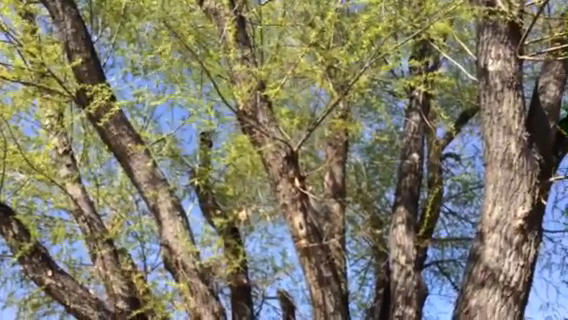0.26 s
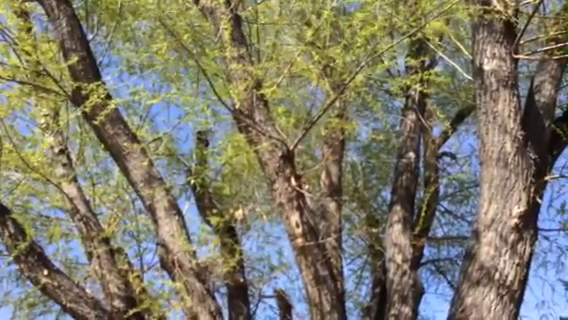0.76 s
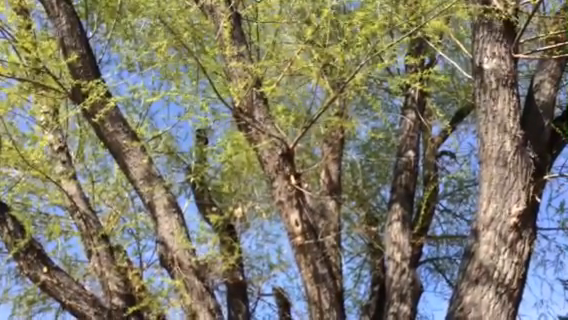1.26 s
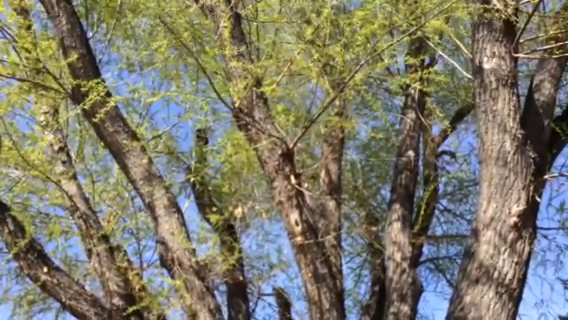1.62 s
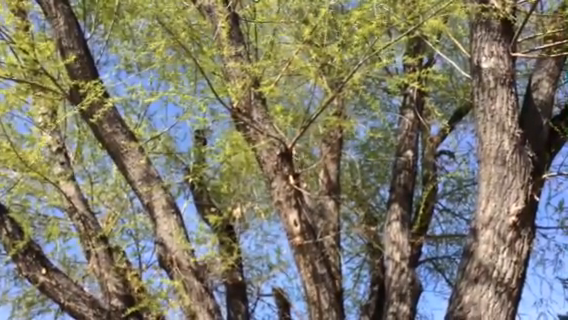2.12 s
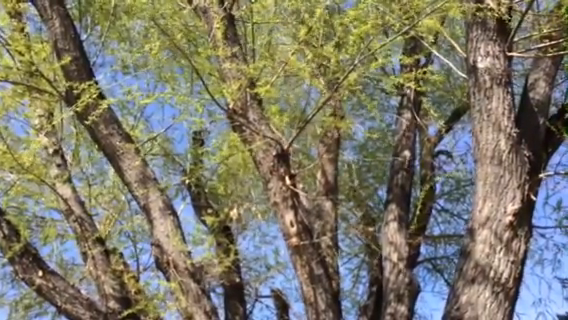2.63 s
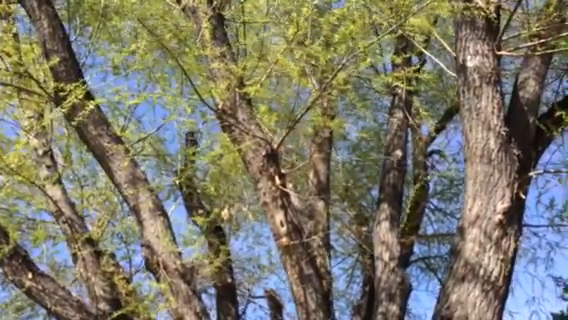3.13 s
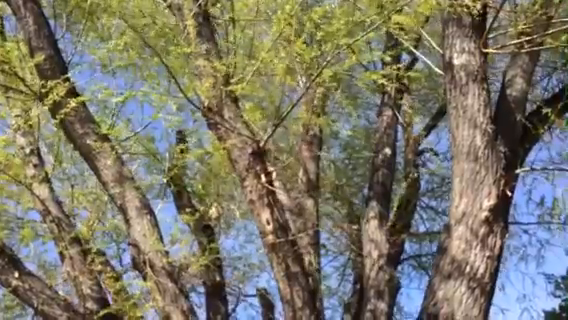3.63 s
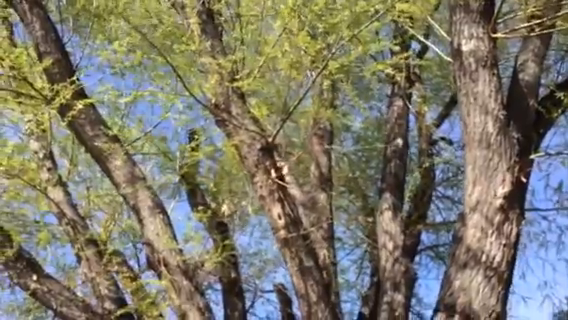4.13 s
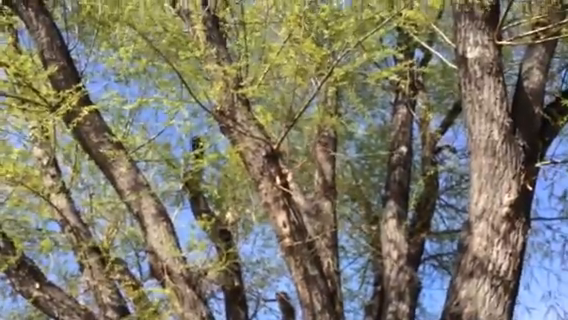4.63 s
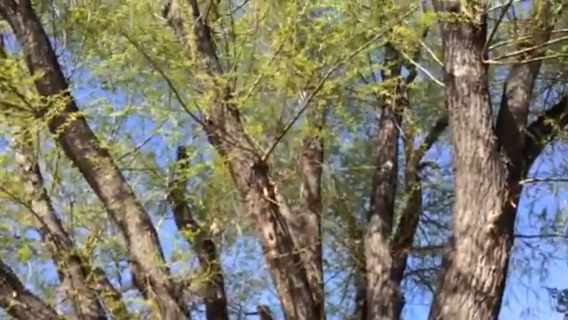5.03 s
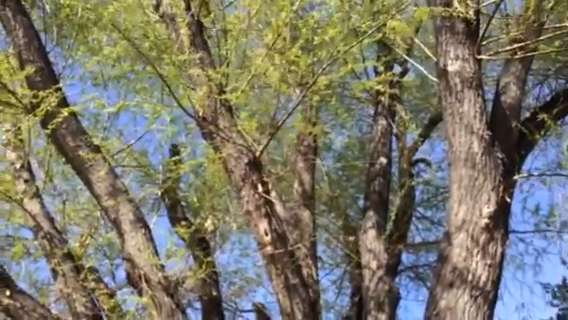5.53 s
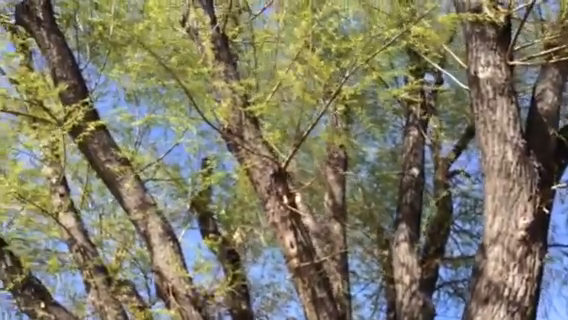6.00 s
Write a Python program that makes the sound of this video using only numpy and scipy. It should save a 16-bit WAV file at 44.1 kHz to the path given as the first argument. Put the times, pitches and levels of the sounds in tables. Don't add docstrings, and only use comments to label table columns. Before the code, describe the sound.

A quiet grove with low, uneven road rumble and barely audible leaves. Two quick bright sparrow chirps come early, amid dry ticks and faint high birdsong. Midway, one woodpecker roll of about seventeen rapid knocks bursts out, dry, woody and hollow, with short woodland echoes. Quick warbler whistles overlap its later part and continue briefly, then distant rough crow caws close the scene. Single-channel microphone, open air, no close handling.

```python
import sys
import numpy as np
from scipy import signal
from scipy.fft import rfft, irfft
from scipy.io import wavfile

SR = 44100
rng = np.random.default_rng(int(sys.argv[2]) if len(sys.argv) > 2 else 0)


def persist_wave(psi):
    counts = np.round(np.clip(psi, -1, 1) * 32767).astype(np.int16)
    wavfile.write(sys.argv[1], SR, np.atleast_2d(counts).T)


def voltage_ratio(level):
    return 10 ** (np.asarray(level, float) / 20)


N = 276066

# start in seconds, strength in dB.
ROLL = [(3.336, -29.5), (3.398, -25), (3.4579, -24.5), (3.5216, -24), (3.5866, -23.5), (3.6536, -23),
        (3.721, -23.5), (3.7911, -24), (3.8606, -22.5), (3.9324, -23), (4.0035, -23), (4.0758, -22),
        (4.1492, -22), (4.223, -23), (4.2973, -23), (4.3723, -22.5), (4.4508, -23.5)]
EVEN_SHARE, SCOOP_SHARE = 0.41, 0.78


def rms_one(x):
    return x / np.sqrt(np.mean(x ** 2) + 1e-20)


def add(track, sound, s):
    i = max(round(s * SR), 0)
    track[i:i + len(sound)] += sound[:N - i]


def convolve(x, response):
    return signal.fftconvolve(x, response)[:N]


def drift(rate_hz, size):
    r = np.exp(-2 * np.pi * rate_hz / SR)
    settle = 8000
    slow = signal.lfilter([1], [1, -2 * r, r * r], rng.standard_normal(size + settle))[settle:]
    return rms_one(slow - slow.mean())


def coloured(spectrum, size):
    hz, db = np.transpose(spectrum)
    bins_hz = np.arange(size // 2 + 1) * SR / size
    shape_db = np.interp(np.log(bins_hz + 1), np.log(hz), db)
    return rms_one(irfft(rfft(rng.standard_normal(size)) * voltage_ratio(shape_db), size))


def band(x, low_hz, high_hz):
    return signal.sosfilt(signal.butter(2, [low_hz, high_hz], "band", fs=SR, output="sos"), x)


def resonance(x, hz, width_hz):
    r = np.exp(-np.pi * width_hz / SR)
    poles = [1, -2 * r * np.cos(2 * np.pi * hz / SR), r * r]
    return signal.lfilter([(1 - r * r) / 2, 0, (r * r - 1) / 2], poles, x)


def dying(noise, t60_s):
    tail = noise * voltage_ratio(-60 * np.arange(len(noise)) / SR / t60_s)
    return tail / np.sqrt(np.sum(tail ** 2))


def glide(length_s, first_hz, middle_hz, last_hz, edge_s=0.0027):
    u = np.linspace(0, 1, round(length_s * SR))
    pitch = np.polyval(np.polyfit([0, 0.5, 1], [first_hz, middle_hz, last_hz], 2), u)
    edge = np.clip(np.minimum(u, 1 - u) * length_s / edge_s, 0, 1)
    return pitch, np.sin(edge * np.pi / 2)


def wavering_phase(pitch, waver, rate_hz):
    trembling = pitch * (1 + waver * drift(rate_hz, len(pitch)))
    return 2 * np.pi * np.cumsum(trembling) / SR


def traffic_and_leaves():
    # time in seconds, level in dB.
    swell = [(0.0, -58.5), (.5, -60), (.82, -55), (1.06, -59.5), (1.71, -57.5), (2.79, -58.5), (3.05, -61),
             (3.82, -53.5), (4.27, -58), (5.18, -56.5), (5.98, -60), (6.26, -57)]
    # frequency in Hz, density in dB per Hz.
    air_colour = [(18, -51), (30, 1.5), (64, 5), (132, 2), (155, 0.5), (248, -14), (601, -21.5),
                  (1180, -24.5), (2270, -31.5), (3630, -32), (5090, -37.5), (12700, -45.5), (15200, -46)]
    t = np.arange(N) / SR
    traffic_db = np.interp(t, *np.transpose(swell))
    leaves_db = -67.5 + 0.1847 * t + 0.063 * (traffic_db - traffic_db.mean())
    air = coloured(air_colour, N)
    low = signal.sosfilt(signal.butter(4, 250, fs=SR, output="sos"), air)
    high = signal.sosfilt(signal.butter(4, 250, "high", fs=SR, output="sos"), air)
    rumble = rms_one(low) * voltage_ratio(traffic_db + 0.34 * drift(3.8, N))
    leaves = rms_one(high) * voltage_ratio(leaves_db + 1.2 * drift(1.54, N))
    return rumble + leaves


def idling_motors():
    # pitch in Hz, width in Hz, level in dB.
    hums = [(73.94, 35, -65.5), (137.9, 15.7, -65.5)]
    out = np.zeros(N)
    for hz, width_hz, db in hums:
        once = resonance(rng.standard_normal(N), hz, width_hz)
        out += voltage_ratio(db) * rms_one(resonance(once, hz, width_hz))
    return out


def twigs():
    # start in seconds, peak in dB, lowest and highest frequency in Hz.
    ticks = [(.1344, -63.5, 4500, 12000), (.519, -44.5, 1200, 3220), (.6, -63, 6000, 7200),
             (0.61, -48, 2300, 10950), (.633, -45, 1900, 7850), (.84, -59, 5500, 9000),
             (0.913, -51, 4500, 8360), (1.245, -59.5, 6500, 10900), (1.284, -60, 6560, 11000),
             (1.379, -51, 1590, 2600), (1.389, -58, 5530, 8950), (1.665, -58, 3500, 9000),
             (2.125, -59, 4500, 8000), (2.326, -58, 5900, 10600), (2.514, -59, 6000, 8950),
             (2.527, -53.5, 4300, 7860), (3.087, -55.5, 5500, 8750), (3.408, -52.5, 7140, 14000),
             (3.449, -56, 4500, 14000), (5.68, -59.5, 5500, 8950)]
    out = np.zeros(N)
    for s, db, low_hz, high_hz in ticks:
        crack = dying(band(rng.standard_normal(900), low_hz, high_hz), 0.0189)
        add(out, voltage_ratio(db + 8.5) * crack, s)
    return out


def crows(calls, throat_hz, sag, breath_db, hiss_db, wet_db):
    out = np.zeros(N)
    rough, spread = 0.035, 0.2
    for s, length_s, top_hz, db in calls:
        pitch, envelope = glide(length_s, 0.97 * top_hz, top_hz, sag * top_hz, edge_s=0.025)
        centre = throat_hz or 2 * top_hz
        phase = wavering_phase(pitch, rough, 130)
        voice = np.zeros(len(pitch))
        for k in range(1, 6):
            weight = np.exp(-0.5 * (np.log(k * top_hz / centre) / spread) ** 2)
            voice += weight * np.sin(k * phase)
        puffs = rng.standard_normal(len(pitch)) * (1 + np.cos(phase))
        breath = voltage_ratio(breath_db) * rms_one(band(puffs, 0.61 * centre, 1.07 * centre))
        hiss = voltage_ratio(hiss_db) * rms_one(band(puffs, 2300, 4400))
        level = voltage_ratio(db + 2.65 * drift(55, len(pitch)))
        add(out, level * envelope * (rms_one(voice) + breath + hiss), s)
    return out + voltage_ratio(wet_db) * convolve(out, dying(rng.standard_normal(SR), 0.987))


def farthest_crows():
    # start in seconds, length in seconds, top pitch in Hz, level in dB.
    far_caws = [(0.01, 0.1135, 650.4, -71.5), (.71, .096, 620.8, -69.5), (.8, 0.13, 658, -66.5),
                (2.93, .11, 754, -70.5), (3.08, 0.12, 741.7, -82.5), (4.72, .21, 775.6, -65.5),
                (4.95, 0.1056, 786, -77.5), (5.2, 0.128, 430, -78)]
    return crows(far_caws, throat_hz=0, sag=0.965, breath_db=-5, hiss_db=-30, wet_db=0.5)


def distant_crows():
    # start in seconds, length in seconds, top pitch in Hz, level in dB.
    caws = [
        (5.35, 0.0693, 551, -66),
        (5.385, .11, 570.1, -61.5),
        (5.5, 0.084, 690, -65),
        (5.67, 0.16, 752, -72.5),
        (5.805, .105, 567.5, -60),
        (5.92, 0.093, 680, -65),
        (6.06, 0.18, 718, -74),
    ]
    return crows(caws, throat_hz=1580, sag=0.91, breath_db=-6, hiss_db=-11, wet_db=-2)


def bent(s, length_s, first_hz, last_hz, db, share):
    return s, length_s, first_hz, first_hz + share * (last_hz - first_hz), last_hz, db


def whistles(notes, flutter_db, waver):
    out = np.zeros(N)
    for s, length_s, first_hz, middle_hz, last_hz, db in notes:
        pitch, envelope = glide(length_s, first_hz, middle_hz, last_hz)
        phase = wavering_phase(pitch, waver, 150)
        level = voltage_ratio(db + 4 + flutter_db * drift(60, len(pitch)))
        tone = np.sin(phase) + voltage_ratio(-31) * np.sin(2 * phase)
        add(out, envelope * level * tone, s)
    return out


def warbler_notes():
    # start in seconds, length in seconds, first pitch in Hz, level in dB.
    falls = [(0, 0.0127, 2600, -83.5), (0.081, 0.0224, 2700, -77), (1.606, 0.066, 4990, -81),
             (1.659, 0.033, 3812, -74), (1.789, .014, 5260, -75), (1.832, .058, 4270, -77),
             (2.008, 0.0107, 4245, -74), (2.02, .13, 4230, -77), (2.142, 0.03, 3400, -76),
             (2.288, .02, 4270, -75.5), (2.315, .036, 4674, -76.5), (2.545, .05, 4250, -77.5),
             (2.805, 0.059, 3500, -79), (3.102, 0.073, 4100, -82.5), (3.195, .02, 3040, -80.5)]
    rises = [(0, .069, 3700, -79), (0.174, 0.027, 2190, -79), (1.61, .025, 2743, -82),
             (1.822, 0.042, 2350, -83.5), (2.059, .03, 2750, -78), (2.285, .015, 2300, -75),
             (2.49, 0.06, 3633, -80), (2.735, .087, 2830, -78)]
    # start in seconds, length in seconds, top pitch in Hz, level in dB.
    held = [(0.343, 0.063, 3200, -80), (0.497, .045, 4600, -75), (0.637, 0.0287, 4050, -75),
            (.875, .1, 2470, -78), (1.855, 0.061, 2950, -77), (1.859, 0.055, 3300, -71.5),
            (2.06, .061, 3224, -77.5), (2.345, 0.043, 3142, -74.5), (2.373, .02, 3950, -78),
            (2.569, 0.0675, 3230, -76), (3.15, 0.028, 3950, -77), (3.7, 0.014, 4430, -82),
            (4.458, 0.032, 3241, -60.5), (4.519, .04, 3258, -74), (4.744, .083, 4700, -80),
            (4.91, 0.023, 4140, -65)]
    # start in seconds, length in seconds, first and last pitch in Hz, level in dB.
    slides = [(3.809, 0.0594, 3300, 4300, -66.5), (4.114, 0.0336, 4170, 4626, -67),
              (4.159, 0.023, 4400, 3660, -60.5), (4.256, 0.039, 3960, 2420, -65.5),
              (4.303, 0.025, 3200, 3804, -65), (4.391, .035, 4350, 3690, -73),
              (4.596, .015, 4220, 3760, -73.5), (4.708, 0.0474, 4030, 4707, -63.5),
              (4.877, 0.036, 4470, 3700, -66.5), (5.02, .012, 2400, 3670, -68),
              (5.035, 0.0176, 3700, 2636, -64), (5.055, .022, 3370, 2820, -74.5)]
    scoops = [(3.657, 0.046, 4900, 3790, -65.5), (4.039, 0.021, 3500, 3828, -66.5),
              (4.547, 0.043, 4380, 4620, -79), (4.564, 0.037, 4180, 2570, -64.5),
              (4.609, .025, 2900, 3620, -65.5), (4.758, 0.023, 4720, 3663, -63.5),
              (4.848, 0.033, 3000, 3348, -72), (4.96, 0.068, 4160, 3330, -77.5),
              (4.984, 0.027, 3500, 2453, -65.5), (5.229, 0.074, 2730, 3320, -74.5),
              (5.3, 0.059, 3530, 2820, -74)]
    notes = [bent(s, d, hz, 0.77 * hz, db, EVEN_SHARE) for s, d, hz, db in falls]
    notes += [bent(s, d, hz, 1.2 * hz, db, SCOOP_SHARE) for s, d, hz, db in rises]
    notes += [(s, d, 0.96 * hz, hz, 0.96 * hz, db) for s, d, hz, db in held]
    notes += [bent(*row, EVEN_SHARE) for row in slides]
    notes += [bent(*row, SCOOP_SHARE) for row in scoops]
    return notes


def songbirds():
    # start in seconds, length in seconds, first and last pitch in Hz, level in dB.
    seep_rows = [(0.438, 0.065, 6240, 4600, -76), (0.472, 0.049, 5600, 4817, -77),
                 (1.245, .04, 6880, 8520, -78), (1.88, 0.03, 6330, 5950, -80),
                 (2.08, 0.047, 6300, 6430, -87), (2.573, 0.0563, 6257, 6300, -71.5)]
    seeps = [bent(*row, EVEN_SHARE) for row in seep_rows]
    dry = whistles(warbler_notes(), flutter_db=1.8, waver=0.006)
    dry += whistles(seeps, flutter_db=3, waver=0.012)
    return dry + voltage_ratio(-6.5) * convolve(dry, dying(rng.standard_normal(SR), 0.28))


def sparrow():
    # seconds from chirp start, length in seconds, first and last pitch in Hz, level in dB.
    chirp = [
        (-.037, .037, 4700, 5900, -67),
        (-.02, .025, 6100, 5500, -72),
        (0.0, .011, 3650, 4400, -60),
        (.004, .027, 4200, 5200, -53.5),
        (.027, .011, 5300, 3600, -55),
        (.034, .014, 3750, 3650, -52),
        (.057, .014, 3800, 3450, -54),
    ]
    # chirp start in seconds, lift in dB.
    chirp_starts = [
        (0.701, -0.5),
        (1.2751, 0),
    ]
    # delay in seconds, level in dB.
    echoes = [(.026, -16), (.058, -11), (.088, -21)]
    notes = []
    for start, lift_db in chirp_starts:
        for s, length_s, first_hz, last_hz, db in chirp:
            notes.append(bent(start + s, length_s, first_hz, last_hz, db + lift_db, EVEN_SHARE))
    dry = whistles(notes, flutter_db=2.0, waver=0.02)
    wet = voltage_ratio(-2) * dry
    wet += voltage_ratio(-5) * convolve(dry, dying(rng.standard_normal(SR), 0.19))
    wet += voltage_ratio(-5) * convolve(dry, dying(rng.standard_normal(SR), 0.07))
    wet += voltage_ratio(-22) * convolve(dry, dying(band(rng.standard_normal(SR), 2900, 3750), 0.7))
    for delay_s, db in echoes:
        add(wet, voltage_ratio(db) * resonance(dry, 3900, 1400), delay_s)
    return wet


def knock(hz, swell_ms):
    swell_s = swell_ms / 1000
    u = np.arange(round(swell_s * SR * 6) + 8) / (swell_s * SR)
    return (u * np.exp(1 - u)) ** 2 * np.sin(2 * np.pi * hz * u * swell_s)


def struck(modes):
    out = np.zeros(N)
    hardest_db = max(db for s, db in ROLL)
    for s, db in ROLL:
        for delay_ms, hz, swell_ms, mode_db in modes:
            bright_db = 0.27 * (db - hardest_db) * min(hz, 3000) / 1000
            chance_db = rng.standard_normal() * (0.3 + hz / 4000)
            size = voltage_ratio(db + mode_db + bright_db + chance_db)
            add(out, size * knock(hz, swell_ms), s + delay_ms / 1000)
    return out


def knock_echoes(direct):
    # delay in ms, level in dB.
    echoes = [(10.2, -8.5), (14.1, -14), (27.8, -20), (31.8, -20)]
    out = np.zeros(N)
    dull = resonance(direct, 1100, 1800)
    for delay_ms, db in echoes:
        add(out, voltage_ratio(db) * dull, delay_ms / 1000)
    slap = resonance(resonance(direct, 2600, 2300), 2600, 3500)
    add(out, voltage_ratio(-10.5) * slap, 0.0623)
    return out


def cracks_and_scatter():
    # frequency in Hz, density in dB per Hz.
    scatter = [(180, -46), (300, 5), (408, -13.5), (760, -7.5), (1260, -2), (1910, -7.5), (2340, -19.5),
               (2860, -17), (4900, -38), (6180, -31), (12000, -53), (15600, -86), (22000, -120)]
    out, clicks = np.zeros(N), np.zeros(N)
    swell = 1 - np.exp(-(np.arange(SR) / SR / 0.0045) ** 2)
    near_size, same_share = 8192, 0.48
    same = coloured(scatter, near_size)
    for s, db in ROLL:
        clicks[round((s - 0.006) * SR)] = voltage_ratio(db)
        crack = dying(band(rng.standard_normal(600), 4500, 11500), 0.012)
        add(out, voltage_ratio(db - 20 + 1.3 * rng.standard_normal()) * crack, s)
        fresh = coloured(scatter, near_size)
        mixed = np.sqrt(same_share) * same + np.sqrt(1 - same_share) * fresh
        add(out, voltage_ratio(db + 5) * dying(swell[:near_size] * mixed, 0.065), s - 0.0025)
    far = dying(swell * coloured(scatter, SR), 0.57)
    wash = dying(swell * band(rng.standard_normal(SR), 1800, 4500), 0.25)
    return out + convolve(clicks, voltage_ratio(1) * far + voltage_ratio(-15) * wash)


def woodpecker():
    # delay in ms, pitch in Hz, swell in ms, level in dB.
    through_wood = [(-7, 1113, 1.5, -11.5), (-2, 2400, 1.0, -26), (-5.5, 818, 2.8, -22.5),
                    (-5.5, 445, 1.67, -11.5), (-10.5, 3200, 1.96, -53)]
    through_air = [(-0.3, 1409, 0.56, 0.5), (-0.32, 1035, 1.52, -14.5), (1.328, 1194, 1.23, -11.5),
                   (-0.097, 2815, 0.78, -14.5), (0.2, 3370, 0.96, -22), (0.16, 1712, 3.2, -31.5),
                   (-0.028, 4107, 0.7, -23.5), (0.43, 5950, 0.28, -21.5), (0.0, 8100, 0.57, -34.5)]
    # pitch in Hz, width in Hz, lift in
    # dB.
    hollow = [(402, 60, -.5), (1076, 25, 0), (1288, 45, 2.5), (3450, 500, -1)]
    direct = struck(through_air)
    out = struck(through_wood) + direct + knock_echoes(direct) + cracks_and_scatter()
    out = out + sum(voltage_ratio(db) * resonance(out, hz, width_hz) for hz, width_hz, db in hollow)
    out -= 0.7 * resonance(out, 665, 100)
    return signal.sosfilt(signal.butter(6, 372, "high", fs=SR, output="sos"), out)


def scene():
    background = traffic_and_leaves() + idling_motors() + twigs()
    birds = farthest_crows() + distant_crows() + songbirds() + sparrow()
    return (background + birds + woodpecker())[None]


def low_pass(x):
    return signal.sosfilt(signal.butter(12, 15540, fs=SR, output="sos"), x)


def record(dry):
    cut = signal.sosfilt(signal.butter(4, 37, "high", fs=SR, output="sos"), dry)
    cut = signal.sosfilt(signal.cheby2(16, 60, 15900, fs=SR, output="sos"), cut)
    return low_pass(cut)


dry = scene()
out = record(dry)
persist_wave(out)
```